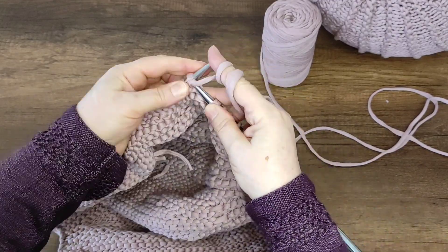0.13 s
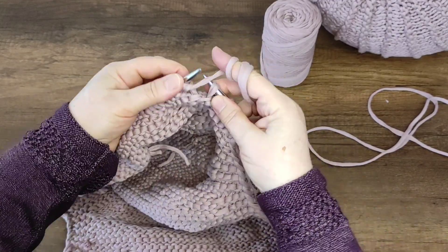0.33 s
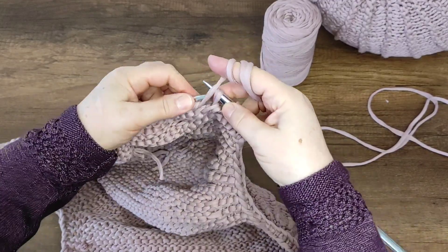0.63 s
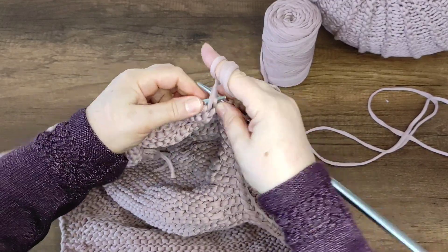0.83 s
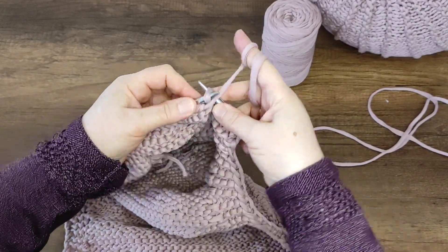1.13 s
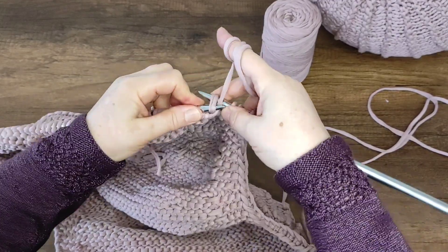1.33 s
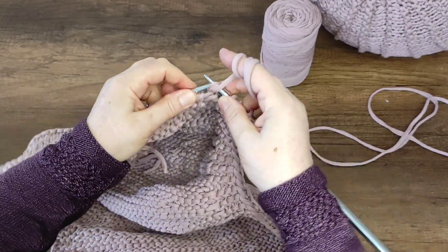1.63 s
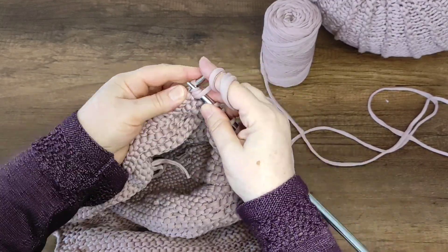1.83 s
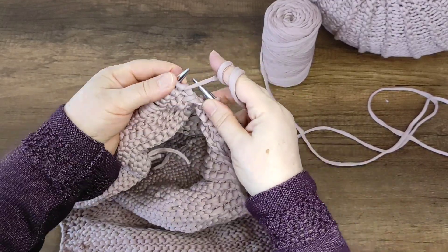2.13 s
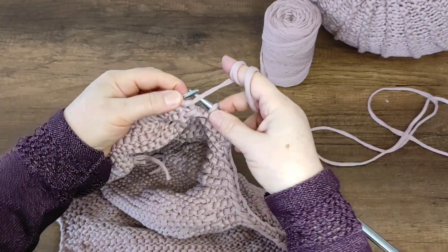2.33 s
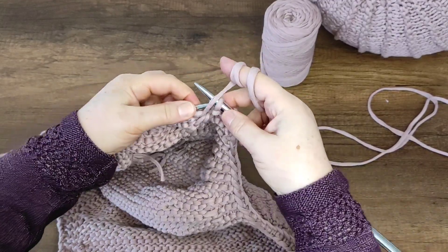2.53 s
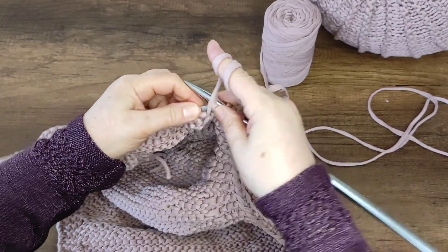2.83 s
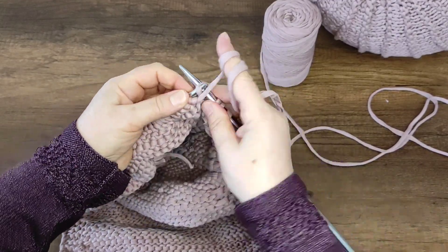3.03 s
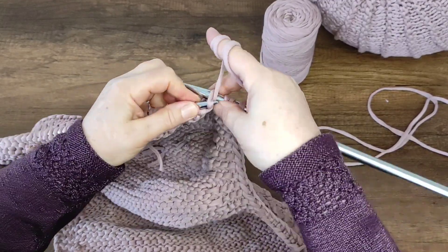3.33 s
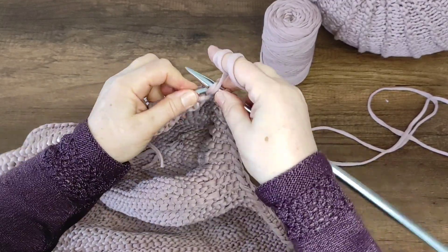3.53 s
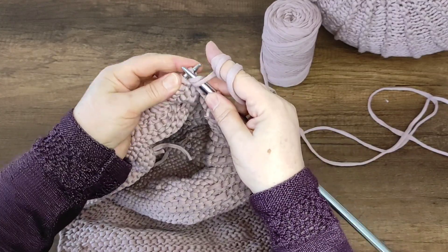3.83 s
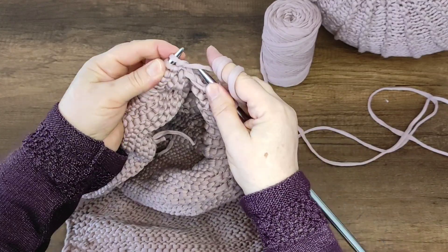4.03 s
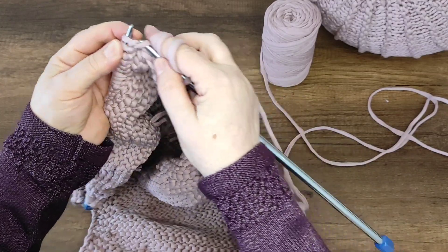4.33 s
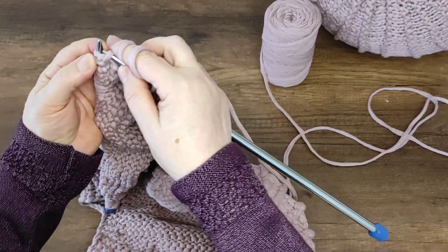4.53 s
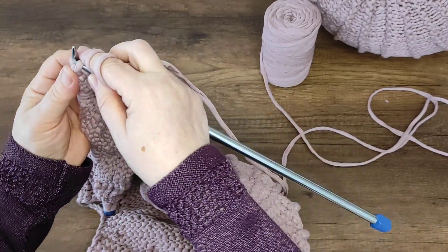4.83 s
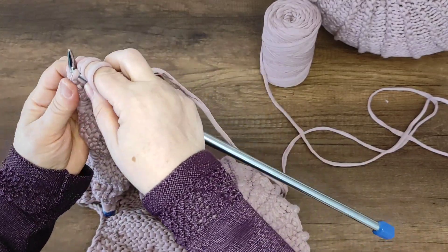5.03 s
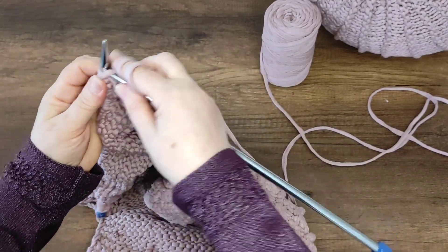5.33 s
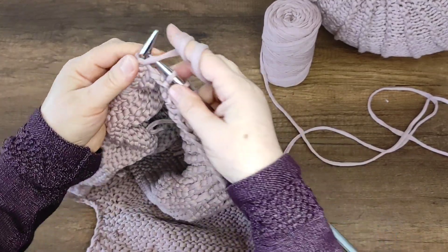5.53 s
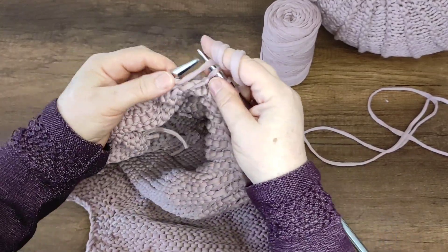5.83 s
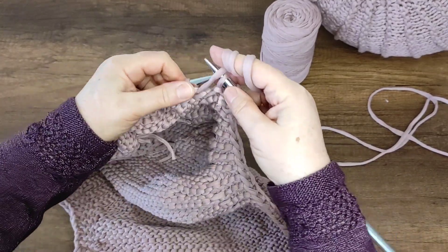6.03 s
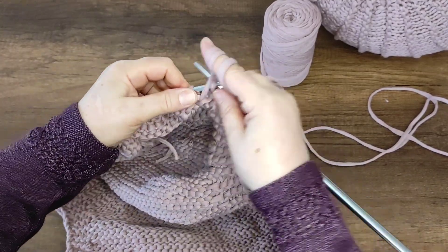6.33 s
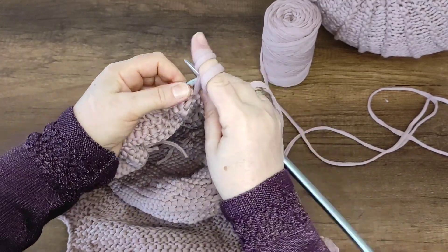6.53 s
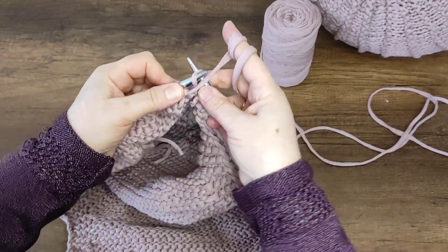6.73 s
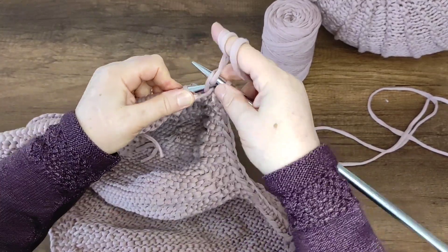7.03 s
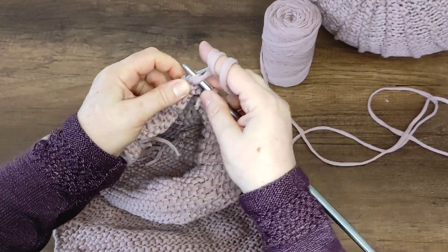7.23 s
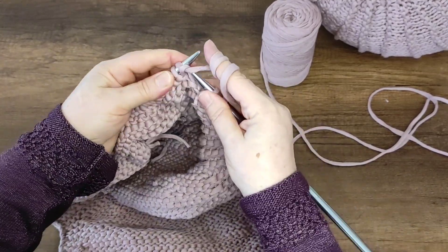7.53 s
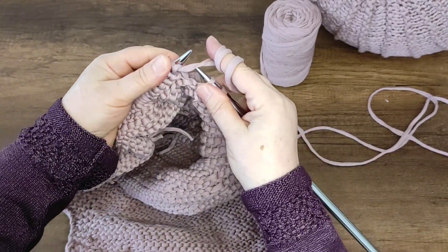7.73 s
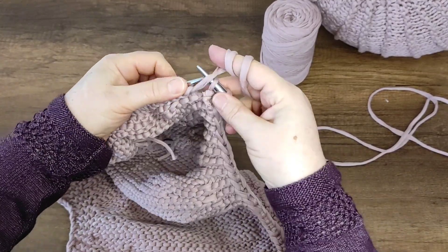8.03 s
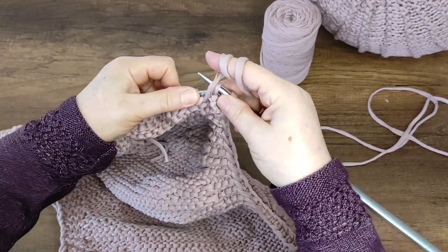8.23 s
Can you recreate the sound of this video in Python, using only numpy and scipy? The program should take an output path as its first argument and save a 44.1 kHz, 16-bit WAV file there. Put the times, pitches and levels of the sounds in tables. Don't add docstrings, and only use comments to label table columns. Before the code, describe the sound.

Dry, bright clicks of metal needles over faint fibrous swishes of chunky yarn, with a low room hum beneath, heard close indoors.

```python
import sys
import numpy as np
from scipy import signal
from scipy.fft import rfft, irfft
from scipy.io import wavfile
from scipy.ndimage import uniform_filter1d

SR = 44100
rng = np.random.default_rng(int(sys.argv[2]) if len(sys.argv) > 2 else 0)


def master(y):
    cut = np.clip(np.atleast_2d(y).T, -1, 1)
    pcm = np.round(cut * 32767)
    wavfile.write(sys.argv[1], SR, pcm.astype(np.int16))


def boost(x):
    u = np.asarray(x, float) / 20
    return 10 ** u


N = 370440


def needles():
    # start_s, peak_db, ring_hz, ring_relative_db, left_minus_right_db
    tips = [
        (0.121, -33.5, 3500, -23, 15),
        (0.9275, -37, 4520, -24, -9),
        (2.4279, -3, 5340, -40, 1.5),
        (2.521, -36, 4730, -20, -13),
        (5.0841, -21.5, 5570, -7, -10.5),
        (5.5402, -20.5, 5900, -4.5, -13.5),
        (8.0215, -4.5, 5710, -42, 5),
    ]
    # start_s, peak_db, ring_hz, ring_relative_db, left_minus_right_db
    strikes = [
        (0.5037, -8, 4970, -1, -8),
        (0.633, -17.5, 4800, -9, -5),
        (2.4919, -21, 3900, -21, -8),
        (6.1725, -18, 4820, 0, -8.5),
    ]
    # start_s, peak_db, ring_hz, thud_relative_db, left_minus_right_db
    shafts = [(0.223, -29.5, 5200, -21, -9), (0.747, -33, 4850, -26, -16), (0.948, -33, 5860, -29, -2),
              (1.465, -12.5, 5530, -29.5, -7), (1.7143, -31, 3640, -17, 1), (2.6636, -21.5, 5800, -19, -1),
              (3.4797, -14.5, 6140, -21.5, -3.5), (4.9312, -36.5, 5320, -3, -6.5),
              (7.0673, -10, 6230, -25.5, -3.5), (7.36, -33.5, 5540, -15.5, -1),
              (8.388, -20.5, 5820, -18.5, -4)]
    # frequency_hz, gain_db
    tip_contact = [(500, -42), (2200, -31), (4500, -15), (7000, 3), (9300, 1), (10500, -5), (13000, -13),
                   (15500, -11)]
    # frequency_hz, gain_db
    shaft_contact = [(500, -45), (2000, -13.5), (4000, -0.5), (7000, 5), (9300, -3.5), (10500, -9.5),
                     (13000, -11), (15500, -21)]
    tip_t60_s, shaft_t60_s = 0.016, 0.0038
    tip_thud_db, strike_thud_db, shaft_ring_db = -53, -28, -13
    chatter_s = 0.0024

    ticks = []
    for start_s, peak_db, hz, ring_db, pan_db in tips:
        ticks.append((start_s, peak_db, hz, ring_db, tip_thud_db, pan_db, tip_contact, tip_t60_s))
    for start_s, peak_db, hz, ring_db, pan_db in strikes:
        ticks.append((start_s, peak_db, hz, ring_db, strike_thud_db, pan_db, shaft_contact, shaft_t60_s))
    for start_s, peak_db, hz, thud_db, pan_db in shafts:
        ticks.append((start_s, peak_db, hz, shaft_ring_db, thud_db, pan_db, shaft_contact, shaft_t60_s))

    out = np.zeros((2, N + 2048))
    t = np.arange(1024) / SR
    u = t / chatter_s
    for start_s, peak_db, hz, ring_db, thud_db, pan_db, hardness, t60_s in ticks:
        chance = rng.standard_normal((3, 3, len(t)))
        uneven = chance[0] * boost(1.97 * chance[1])
        contacts = pair(uneven, 0.44) * u ** 1.26 * np.exp(-5 * u)
        crack = colour(contacts, hardness)
        ring = np.sin(2 * np.pi * hz * t) * boost(-60 * t / t60_s)
        tube = signal.fftconvolve(contacts, ring[None], axes=1)[:, :len(t)]
        thud = band(pair(chance[2], 0.4) * u * np.exp(-1.8 * u), 790, 6750)
        tick = crack / peak(ports(crack))
        tick += boost(ring_db - 8.5) * tube / peak(tube)
        tick += boost(thud_db + 10.5) * thud / peak(thud)
        i = int(start_s * SR)
        out[:, i:i + len(t)] += boost(peak_db + 3.0) * sides(pan_db)[:, None] * tick
    return out[:, :N]


def yarn():
    # frequency_hz, gain_db
    fibre_tone = [(600, -9), (2000, -13), (4000, -3), (7000, 1), (9300, -4.5), (10300, -10), (12800, -10),
                  (15500, -14)]
    slide, drag = strokes()
    catch_db = 2.2 * walk(110, channels=1) + 0.63 * walk(350, channels=2) + 1.84 * walk(25, channels=1)
    catch = boost(catch_db)
    grains = pair(rng.standard_normal((3, N)), 0.13) * catch
    fibres = boost(-8) * unit(colour(grains, fibre_tone))
    cloth = boost(-2) * unit(band(rng.standard_normal((2, N)) * catch, 1500, 4700))
    return sides(1.33)[:, None] * (slide * fibres + drag * cloth)


def strokes():
    # full_stroke_s, level_db, length_s, cloth_relative_db, left_minus_right_db
    pulls = [(0.125, -36.5, 0.18, -31, -3), (0.335, -31.5, 0.037, -29, 3), (0.31, -39, 0.44, -10, -4.5),
             (0.77, -39.5, .11, -4, -5), (0.96, -43.5, 0.25, -19, -8), (1.19, -42.5, 0.35, -13.5, -1),
             (1.49, -43, 0.34, -7, -2), (1.78, -42, .16, -12, -2.5), (3.26, -45.5, 0.24, -16, -1),
             (3.75, -37, 0.039, -20, 4), (3.99, -40, 0.36, -31, -3), (4.285, -44.5, .1, -9, -4),
             (7.5, -40, 0.3, -29, -1.5), (4.82, -36, 0.095, -25, -7), (5.28, -38.5, 0.29, -18, -5),
             (5.455, -42, 0.07, -12, -8), (5.58, -32.5, .06, -32, -6), (5.625, -36, 0.11, -34, -5),
             (6.47, -36, 0.086, -13.5, -4.5), (6.84, -44.5, 0.25, -22, -1), (7.6, -36.5, 0.13, -22, -1.5),
             (7.8, -35.5, 0.23, -16.5, -2.5)]
    slips = [(0.245, -57, .08, -6, -4), (0.53, -32, .1, -18, 1), (1.66, -36.5, 0.065, -10, -4.5),
             (2.78, -50, 0.18, -32, -7), (2.935, -39.5, 0.11, -14, -4.5), (3.51, -42, 0.22, -10.5, 0.5),
             (4.7, -40, 0.099, -49, -4), (6.66, -39, 0.17, -19, -1.5), (7.1, -39.5, 0.24, -8, -2),
             (7.36, -36.5, 0.12, -20, -5), (8.228, -45, 0.035, -12, -4.5), (8.14, -47, .1, -6, -5),
             (7.92, -39.5, 0.091, -14, -2), (8.05, -42, 0.32, -15, -9)]
    feeds = [(0.564, -47, 0.15, -6.5, -1), (2.038, -41.5, 0.38, -17.5, -2), (2.405, -45, 0.19, -20, -7),
             (3.56, -47, .4, -22, -6), (4.04, -45.5, 0.19, -14.5, -1), (4.92, -53, 0.32, -8, -10.5),
             (4.33, -51, 0.39, -5.5, -7), (6.93, -50, .2, -8, -4), (5.97, -47.5, 0.24, -5.5, -4),
             (6.2, -48, 0.14, -2.5, -4), (3.0, -49, 0.21, -18, -5)]
    kinds = [(pulls, 0.64, 0.013), (slips, 0.35, 0.018), (feeds, 0.17, 0.6)]
    depth_db = 17.5
    rest_db, rest_cloth_db, rest_pan_db = -63.5, -4, -16

    t = np.arange(0, N, 64) / SR
    rest = boost(rest_db + np.array([[0], [rest_cloth_db]])) * sides(rest_pan_db)
    power = rest[..., None] ** 2 + 0 * t
    for table, rise, hold in kinds:
        for full_s, level_db, length_s, cloth_db, pan_db in table:
            u = (t - full_s) / length_s
            before = -u / rise
            after = (u - hold) / max(1 - rise - hold, .05)
            away = np.maximum(np.maximum(before, after), 0)
            gain = boost(np.array([[0], [cloth_db]])) * sides(pan_db)
            power = power + (gain[..., None] * boost(level_db - depth_db * away)) ** 2
    return np.repeat(np.sqrt(power), 64, axis=2)[..., :N]


def room(x):
    # delay_ms, level_db
    echoes = [(3.7, -8.5), (6.5, -17), (10, -23), (13.5, -13)]
    t60_s, tail_db = 0.28, -10.5
    t = np.arange(int(.5 * SR)) / SR
    noise = rng.standard_normal((2, len(t)))
    dull = signal.sosfilt(signal.butter(2, 9500, fs=SR, output="sos"), noise)
    tail = dull * boost(-60 * t / t60_s) * np.clip(t / 0.0015, 0, 1)
    response = boost(tail_db) * tail / np.sqrt(np.sum(tail ** 2, axis=1, keepdims=True))
    for delay_ms, level_db in echoes:
        late = t - delay_ms / 1000
        response += boost(level_db - 11.5) * dull * np.exp(-np.abs(late) / 0.00028)
    return x + signal.fftconvolve(x, response, axes=1)[:, :N]


def hum():
    # time_s, level_db
    rumble_level = [(0.0, -56.5), (1.57, -52.5), (2.0, -53), (2.6, -58), (3.13, -55), (3.5, -56.5),
                    (4.25, -53), (5.0, -54), (5.85, -56.5), (7.3, -54.5), (8.4, -57)]
    # frequency_hz, density_db_per_hz
    air_tone = [(15, 2.5), (90, -13), (200, -12), (700, -21), (2600, -30), (7000, -37), (12300, -47),
                (14000, -70)]
    air = colour(pair(rng.standard_normal((3, N)), 0.25), air_tone)
    air /= np.std(band(air, 100, 590))
    low = signal.sosfilt(signal.butter(2, 700, fs=SR, output="sos"), air)
    time_s, level_db = np.transpose(rumble_level)
    swell_db = np.interp(np.arange(N) / SR, time_s, level_db) + 2.0 + 0.8 * walk(5, channels=2)
    swell = boost(swell_db) * sides(3.8)[:, None]
    drift = signal.lfilter([1], [1, -np.exp(-2 * np.pi * 6 / SR)], rng.standard_normal((2, N)))
    return swell * low + boost(-53.5) * (air - low) + boost(-50.0) * unit(drift) - .0006


def ports(x):
    # resonance_hz, width_hz, boost_db, gain_db
    cavities = [
        (8730, 480, 16.5, 0),
        (7524, 740, 16.5, -1),
    ]
    out = []
    for side, (hz, width_hz, boost_db, gain_db) in zip(x, cavities):
        ring = signal.lfilter(*signal.iirpeak(hz, hz / width_hz, SR), side)
        out.append(boost(gain_db) * (side + (boost(boost_db) - 1) * ring))
    return np.array(out)


def pair(noise, shared):
    left_lag = 6
    common = np.array([np.roll(noise[2], left_lag), noise[2]])
    shared = np.clip(shared, 0, 1)
    return np.sqrt(shared) * common + np.sqrt(1 - shared) * noise[:2]


def sides(pan_db):
    return boost(np.array([pan_db, -pan_db]) / 2)


def walk(rate, channels):
    k = int(SR / rate)
    held = np.repeat(rng.standard_normal((channels, N // 40)), k, axis=1)[:, :N]
    return uniform_filter1d(uniform_filter1d(held, k), k)


def colour(x, points):
    hz, db = np.transpose(points)
    grid_hz = np.maximum(np.fft.rfftfreq(2048, 1 / SR), 1)
    gain = boost(np.interp(np.log(grid_hz), np.log(hz), db))
    cepstrum = irfft(np.log(gain))
    cepstrum[1:1024] *= 2
    cepstrum[1025:] = 0
    response = irfft(np.exp(rfft(cepstrum)))
    return signal.fftconvolve(x, response[None], axes=1)[:, :x.shape[1]]


def band(x, lo_hz, hi_hz):
    return signal.sosfilt(signal.butter(2, [lo_hz, hi_hz], "bandpass", fs=SR, output="sos"), x)


def unit(x):
    return x / rms(x)


def rms(x):
    return np.sqrt(np.mean(x ** 2, axis=-1, keepdims=True))


def peak(x):
    return np.abs(x).max(axis=1, keepdims=True)


def scene():
    return room(needles()) + yarn() + hum()


def band_limit(x):
    return signal.sosfilt(signal.butter(12, 16300, fs=SR, output="sos"), x)


def record(dry):
    top_cut = signal.ellip(6, .3, 45, 15400, fs=SR, output="sos")
    heard = signal.sosfilt(top_cut, ports(dry))
    return band_limit(np.clip(heard, -1, 1))


dry = scene()
out = record(dry)
master(out)
```